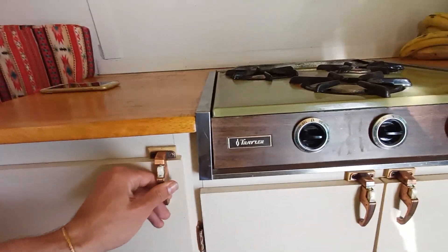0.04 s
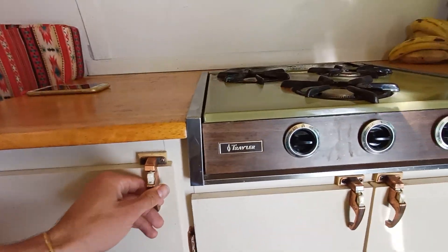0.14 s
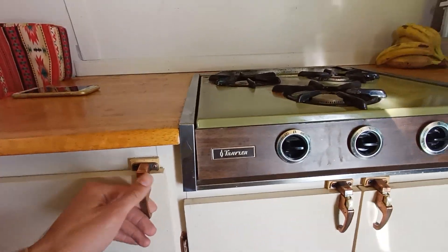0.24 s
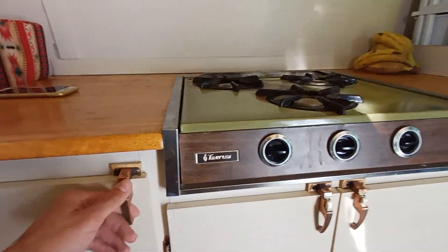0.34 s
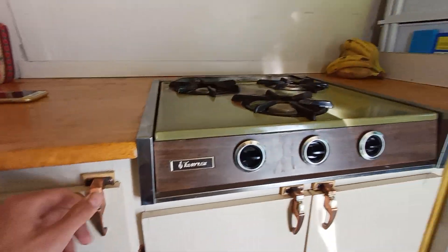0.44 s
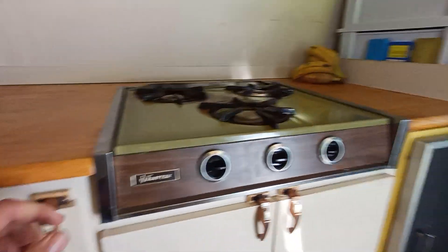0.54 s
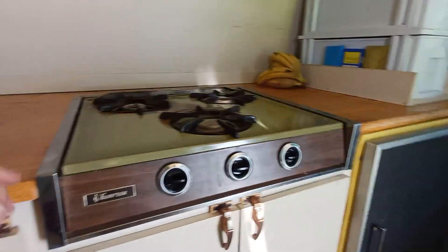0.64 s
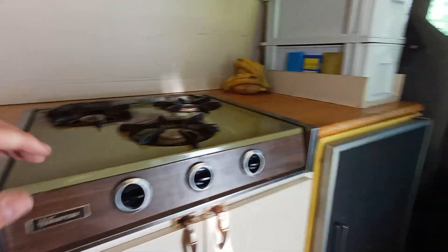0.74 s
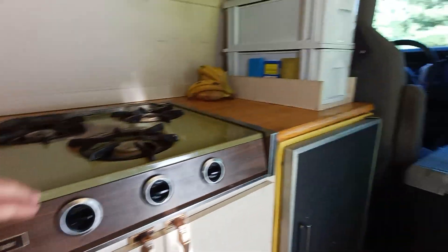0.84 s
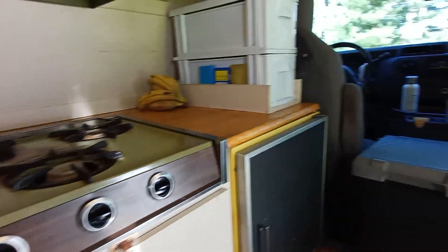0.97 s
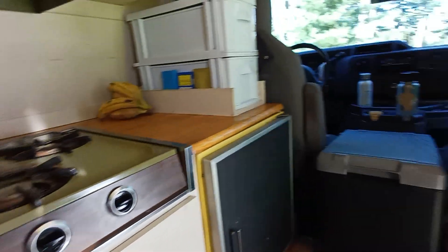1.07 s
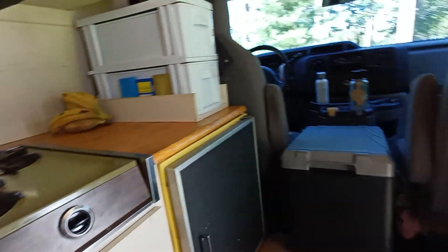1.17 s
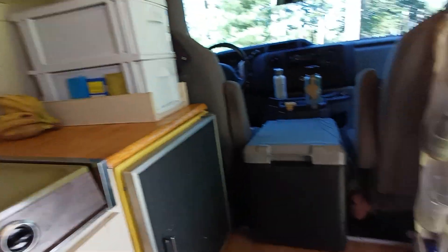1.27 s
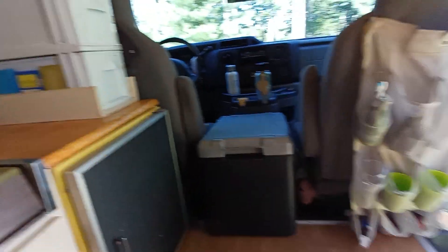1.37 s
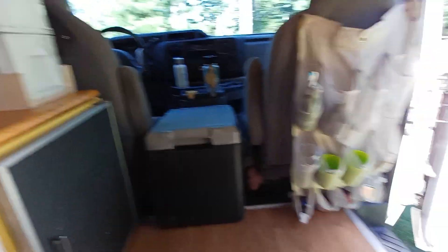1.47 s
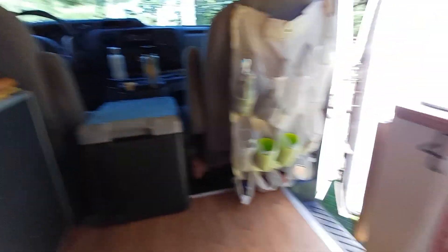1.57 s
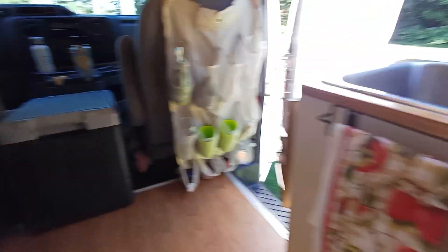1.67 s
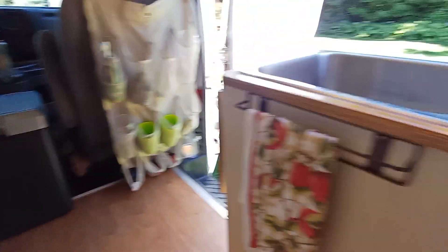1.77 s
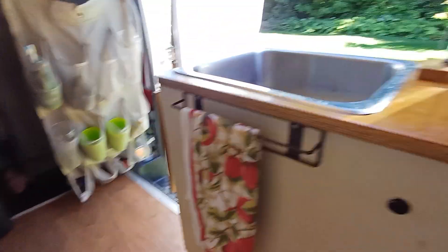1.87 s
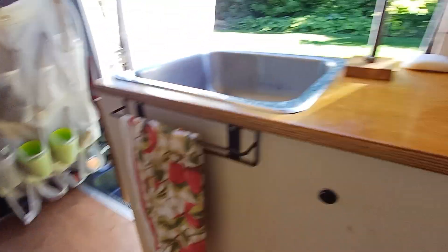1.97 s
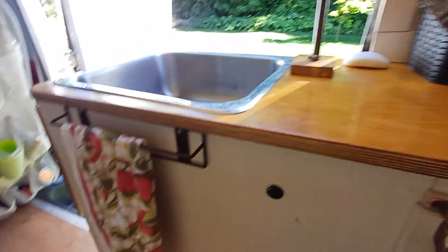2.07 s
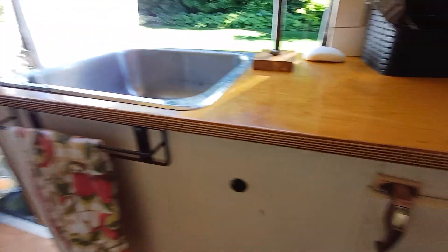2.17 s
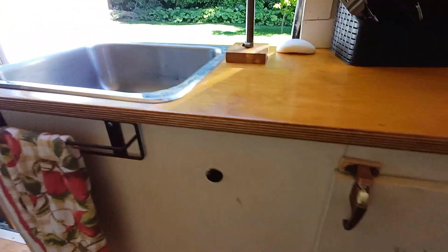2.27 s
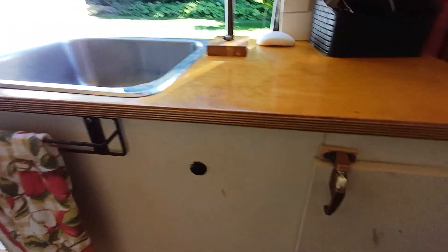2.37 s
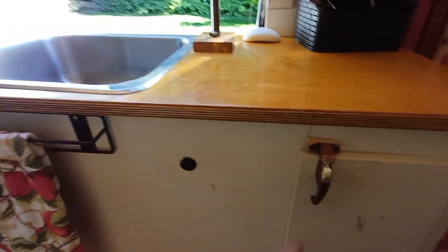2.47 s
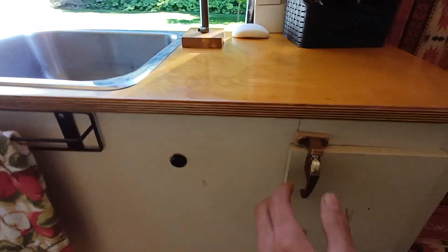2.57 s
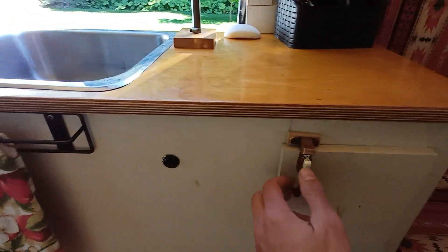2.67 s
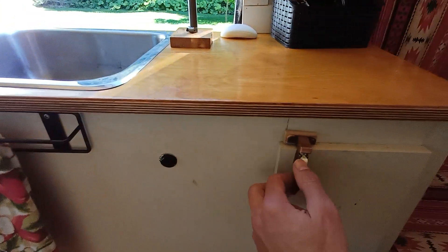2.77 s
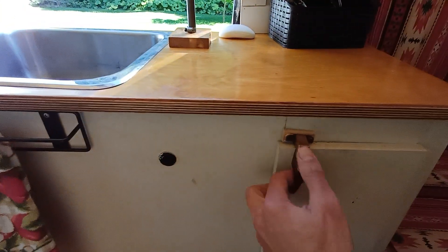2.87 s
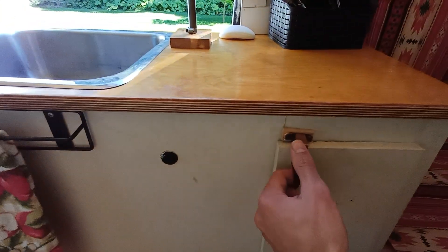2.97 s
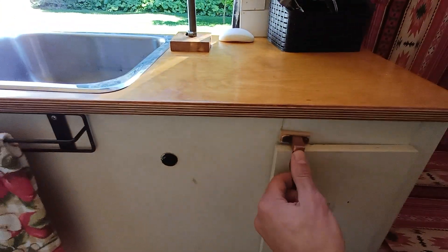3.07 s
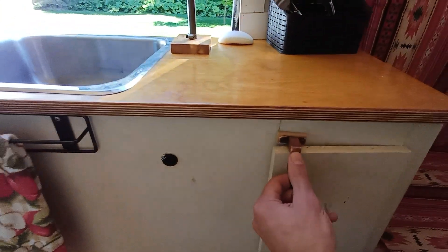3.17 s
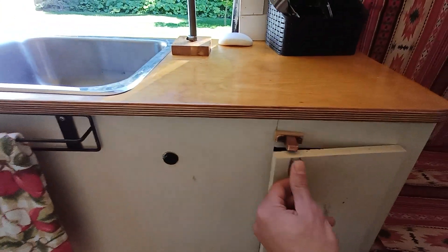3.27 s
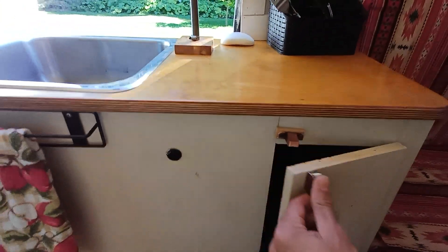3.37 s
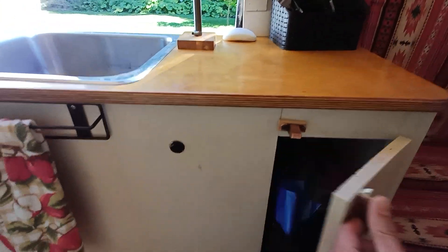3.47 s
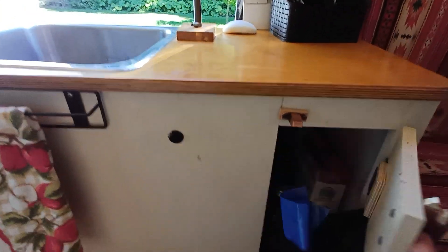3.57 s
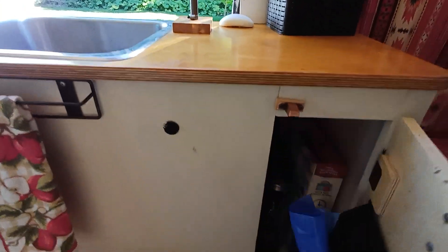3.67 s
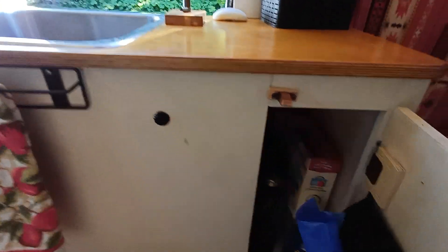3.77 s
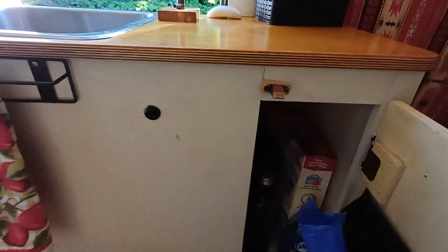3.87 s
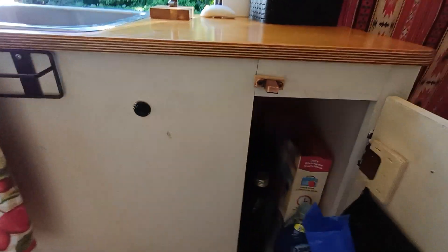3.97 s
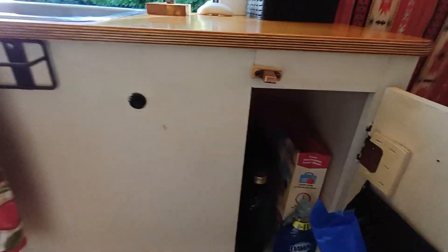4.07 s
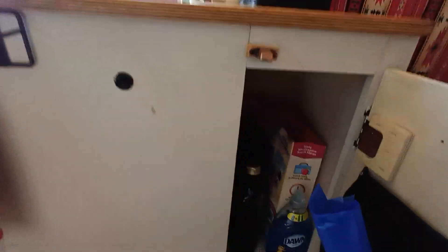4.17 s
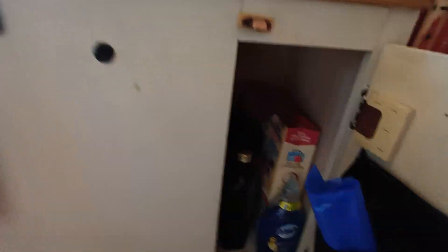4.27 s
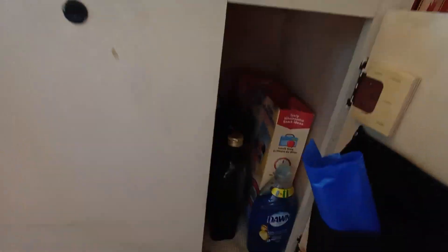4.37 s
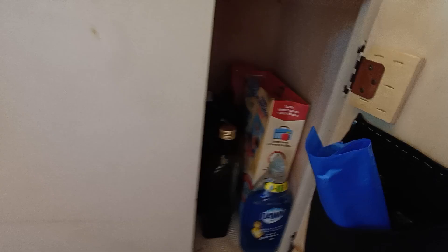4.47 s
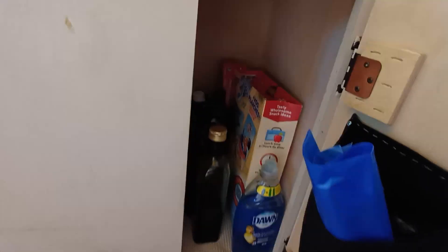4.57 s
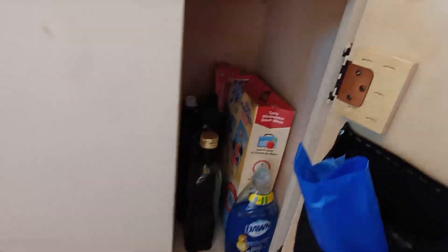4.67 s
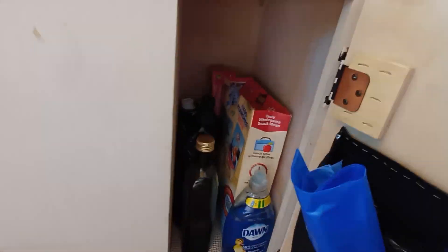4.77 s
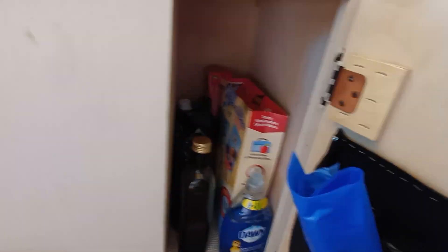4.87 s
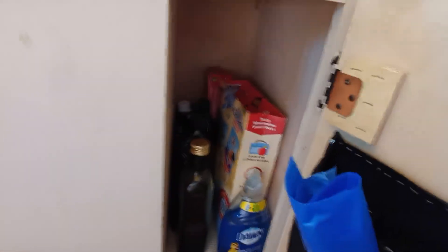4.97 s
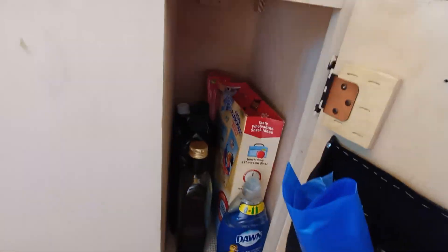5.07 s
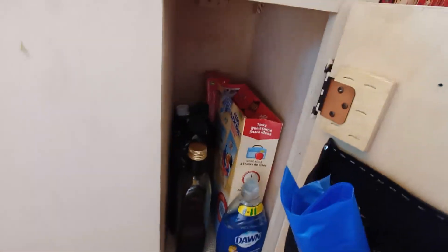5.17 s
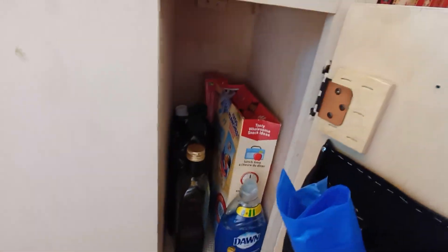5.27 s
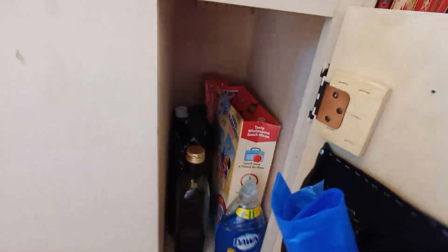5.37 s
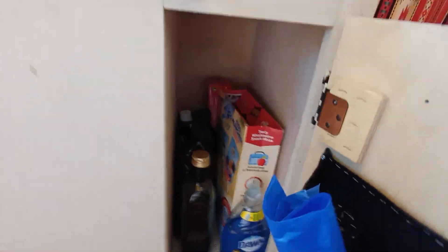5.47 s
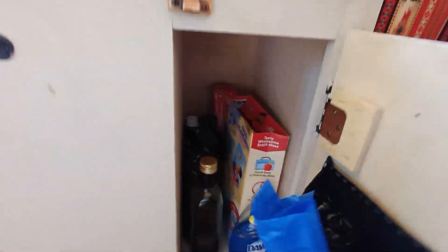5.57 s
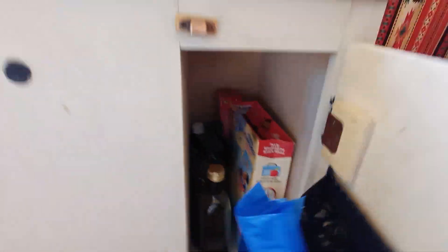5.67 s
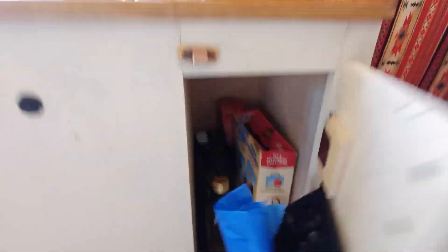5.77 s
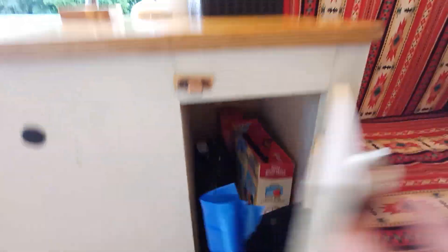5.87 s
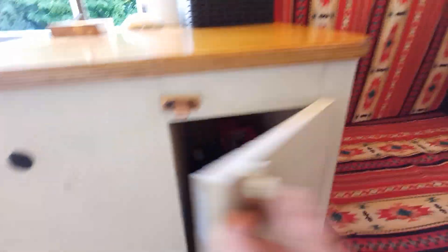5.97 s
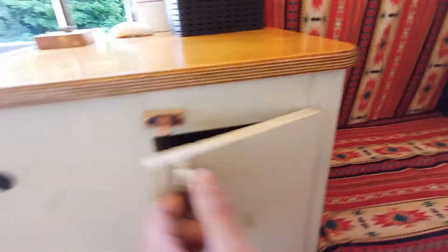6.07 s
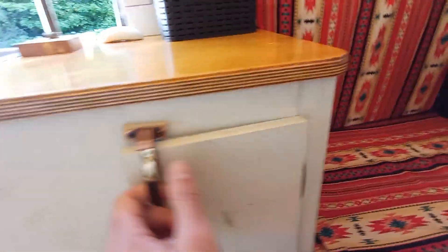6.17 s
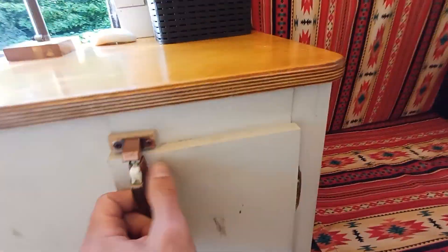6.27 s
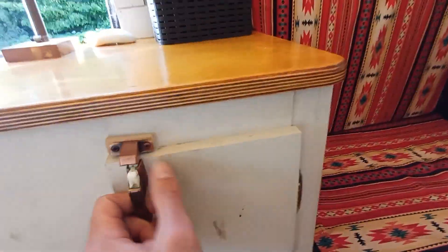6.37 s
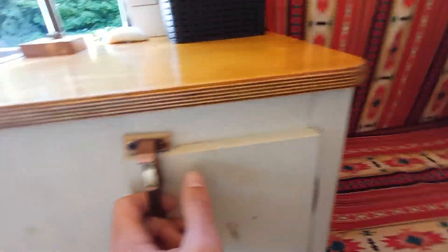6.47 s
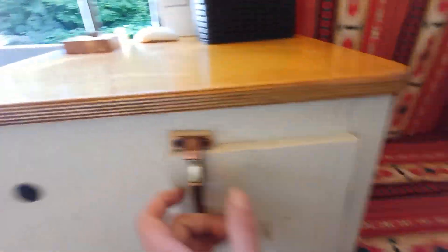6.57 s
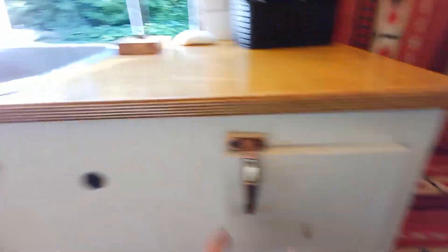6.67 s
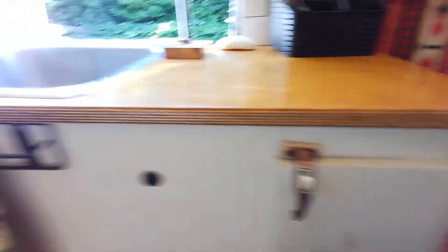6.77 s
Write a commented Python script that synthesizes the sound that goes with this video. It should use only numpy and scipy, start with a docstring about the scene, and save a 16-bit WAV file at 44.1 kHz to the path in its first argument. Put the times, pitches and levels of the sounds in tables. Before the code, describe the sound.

In the cramped interior of a parked camper van, heard from close up, a wooden cupboard door thuds and rattles as it is latched. Soft footfalls and rustling clothes come next, then light knocks and clicks as a second door is unlatched. Only a faint hum and a far-off outdoor hush remain for a couple of seconds, until the door is shut with a loud clack of wood and metal.

```python
"""Inside a parked camper van, a hand latches the small plywood door of the stove cabinet. The person
turns round, pops the metal catch of the door under the sink, swings it open and claps it shut.
Each impact excites damped modes: the frame thuds, the panel knocks, the catch clicks, and the close
walls add a short reverberation. The steel sink rings on faintly and clothes swish by friction with
each move. A low hum and a distant outdoor wash lie underneath."""
import sys
import numpy as np
from scipy import signal
from scipy.fft import rfft, irfft
from scipy.io import wavfile
from scipy.ndimage import uniform_filter1d

SR = 44100
rng = np.random.default_rng(int(sys.argv[2]) if len(sys.argv) > 2 else 0)


def digitize_waveform(pressure):
    """Quantize a signal to 16-bit integers and store it at the path in sys.argv[1].

    Rows of a 2-D input are taken as channels; values are limited to [-1, 1].
    """
    field = np.atleast_2d(pressure).T
    bounded = np.clip(field, -1, 1)
    quanta = np.round(bounded * 32767).astype(np.int16)
    wavfile.write(sys.argv[1], SR, quanta)


N = 300762
TIME = np.arange(N) / SR
RING_TIME = np.arange(SR // 3) / SR  # time since an impact [s]

# left-right coherence of nearby sources and of a diffuse field: (frequency [Hz], coherence [1])
NEAR_COHERENCE = [(60, .995), (140, .985), (280, .92), (550, .8), (1100, .45), (2000, .03), (16000, 0)]
DIFFUSE_COHERENCE = [(60, 0.6), (160, 1), (270, .69), (450, 0.85), (740, 0.12), (1220, -0.17), (3300, 0.14),
                     (16000, 0.58)]
# modes of the cabinets: (frequency [Hz], relative level [dB], nominal T60 [s])
STOVE_FRAME_MODES = [(63, 0, .19), (92, -6, .1), (108, -6, .1), (136, -3, .15)]
SINK_PANEL_MODES = [(264.4, -11.5, 0.17), (335, -4.5, 0.14), (374, -11, 0.12), (529, -23.5, 0.25),
                    (664, -12.5, 0.18), (865, -18, 0.12), (1060, -3, 0.14), (1120, 0, 0.094),
                    (1194, -0.5, 0.073), (1545, -2, 0.052), (1688, -2, 0.098), (1908, -11.5, 0.2),
                    (2244, -1, 0.084), (2375, -3.5, 0.12), (2800, -2.5, 0.086), (3168, -2, 0.063)]


def amp(db):
    return 10 ** (np.asarray(db) / 20)


def unit_rms(x):
    return x / np.sqrt(np.mean(x ** 2) + 1e-20)


def curve_at(points, hz):
    """Interpolation on a logarithmic frequency axis."""
    frequency, value = np.transpose(points)
    return np.interp(np.log(hz + 1), np.log(frequency + 1), value)


def pan_gains(db):
    """A level difference, split equally between left and right."""
    return amp(np.array([[.5], [-.5]]) * db)


def pan_spectrum(x, balance):
    """A level difference that varies with frequency leans each band left or right."""
    return irfft(rfft(x) * pan_gains(curve_at(balance, np.fft.rfftfreq(N, 1 / SR))), N)


def noise(spectrum, coherence=DIFFUSE_COHERENCE, size=N):
    """Partial coherence: two channels of coloured noise share part of a random-phase signal."""
    hz = np.fft.rfftfreq(size, 1 / SR)
    left, independent = np.exp(2j * np.pi * rng.random((2, len(hz))))
    shared = np.clip(curve_at(coherence, hz), -1, 1)
    right = shared * left + np.sqrt(1 - shared ** 2) * independent
    return unit_rms(irfft(np.array([left, right]) * amp(curve_at(spectrum, hz)), size))


def background(hum_db=-60.5, hum_follows=0.39, swell_db=2, wash_gain_db=4.5):
    """Slow amplitude modulation of noise: an unevenly swelling hum and the wash from outdoors."""
    # (frequency [Hz], relative spectral density [dB])
    hum_spectrum = [(12, -46), (20, -15.5), (35, -14), (59, -1.5), (130, -5.5), (166, -16.5), (204, -14),
                    (242, -23.5), (300, -15.5), (390, -34), (660, -120)]
    wash_spectrum = [(120, -25), (200, -8), (300, -9), (420, -14), (600, -10), (810, 0), (1000, -4),
                     (1500, -6), (2020, -8), (2450, -23), (3100, -31), (8000, -37), (9400, -41),
                     (12000, -37), (16000, -38)]
    # lean of the wash: (frequency [Hz], left minus right [dB])
    wash_balance = [(60, 3), (110, -3), (200, 5.5), (380, 2), (700, 0), (1290, -3), (2380, -5),
                    (4400, -1.5), (8120, 4), (15000, -3.5)]
    # slow rise and fall, low after each clatter: (time [s], relative level [dB])
    contour = [(.4, -65.5), (.75, -73.5), (1.3, -62), (2.3, -61), (2.95, -62.5), (3.35, -57.5), (3.7, -62),
               (4.6, -66), (5.3, -63), (6.15, -62.5), (6.5, -66), (6.8, -63.5)]
    knots = np.arange(0, N / SR + 1, .12)
    swell = swell_db * np.interp(TIME, knots, rng.standard_normal(len(knots)))
    contour_db = np.interp(TIME, *np.transpose(contour))
    hum = amp(hum_db + hum_follows * (contour_db - contour_db.mean()) + swell) * noise(hum_spectrum)
    wash = amp(contour_db + wash_gain_db) * noise(wash_spectrum)
    return hum + pan_spectrum(wash, wash_balance)


def van_reverb(x, wet_db):
    """Reverberation: dense reflections from close furnished walls die at a rate set by frequency."""
    # reverberation time: (frequency [Hz], T60 [s])
    decay_times = [(100, 0.45), (400, 0.29), (1200, 0.094), (4000, 0.18), (9000, 0.05), (16000, 0.18)]
    reflections = noise([(60, -13.5), (200, -3), (600, 2.5), (16000, -3.0)], size=len(RING_TIME))
    hz, t, bands = signal.stft(reflections, SR, nperseg=256)
    decay = amp(-60 * t / curve_at(decay_times, hz)[:, None])
    tail = signal.istft(bands * decay, SR, nperseg=256)[1][:, :len(RING_TIME)] * onset(0.007)
    return x + amp(wet_db) * signal.fftconvolve(x, tail / np.linalg.norm(tail[0]), axes=1)[:, :N]


def basin(start_s=3.11):
    """Free vibration: the lightly damped steel sink rings on once its door is free."""
    # (frequency [Hz], level [dB], T60 [s])
    modes = [(118, -59.5, 3.5), (297, -68.5, 4.2)]
    age = np.maximum(TIME - start_s, 0)
    return sum(amp(db - 60 * age / t60) * np.sin(2 * np.pi * hz * age) for hz, db, t60 in modes)


def resonate(x, hz, width_hz):
    """Heterodyning: shift down, low-pass and shift back for a resonance that follows the curve hz."""
    carrier = np.exp(2j * np.pi * np.cumsum(hz) / SR)
    return 2 * (carrier * signal.lfilter(*signal.butter(2, width_hz / 2, fs=SR), x / carrier)).real


def cloth_strokes(edge_db=-19.5, roundness=1.66):
    """Incoherent addition: arched strokes sum in power, and the strongest dominates the pitch."""
    # the body turns round, then the arm swings the sink door open and shut:
    # (peak time [s], rise [s], fall [s], relative swish [dB], relative fizz [dB], weave pitch [Hz])
    strokes = [ (0.89, 0.12, 0.13, -66, -74.5, 3000), (1.28, .14, 0.17, -51.5, -57, 2800),
               (1.39, 0.15, 0.092, -49, -58.5, 3200), (1.68, 0.24, 0.12, -62.5, -71, 3000),
               (1.80, 0.076, 0.095, -36.5, -57, 2267), (1.86, 0.11, 0.13, -30.5, -46, 3226),
               (1.95, 0.13, 0.13, -33.5, -49.5, 3756), (2.015, 0.055, 0.1, -38, -48, 3500),
               (2.19, 0.087, 0.069, -44.5, -58, 3200), (3.425, 0.12, 0.076, -59.5, -65.5, 2700),
               (3.485, 0.069, 0.06, -53, -68, 4200), (3.85, 0.068, 0.14, -56, -81, 2800),
               (5.99, .06, .08, -77, -97, 2780), (6.165, .04, .05, -65, -64.5, 3026),
               (6.21, 0.066, 0.043, -58, -65, 2887), (6.59, .04, 0.11, -81, -76.5, 2900)]
    peak, rise, fall, swish_db, fizz_db, hz = np.transpose(strokes)[:, :, None]
    t = np.linspace(0, N / SR, num=N // 64)
    from_peak = np.maximum((peak - t) / rise, (t - peak) / fall)
    arch_db = np.maximum(edge_db * from_peak ** roundness, -120)
    swish_power, fizz_power = amp(swish_db + arch_db) ** 2, amp(fizz_db + arch_db) ** 2
    weave_hz = np.average(hz * np.ones_like(t), axis=0, weights=swish_power)
    controls = np.sqrt(swish_power.sum(0)), np.sqrt(fizz_power.sum(0)), weave_hz
    return [np.interp(TIME, t, control) for control in controls]


def clothes(swish_db=-2, weave_db=-1.0, grip_db=0.58, snag_db=1.0):
    """Friction noise: cloth slides over cloth, the weave sings, folds and fibres catch unevenly."""
    # the rub and its fine fizz: (frequency [Hz], relative spectral density [dB])
    cloth_spectrum = [(59, -51), (100, -17), (140, -12), (252, -12), (388, -7), (524, -10), (670, -2),
                      (872, -17.5), (958, -5), (1070, -8), (1820, -2.5), (3650, -2.5), (9000, -12),
                      (11700, -50.5), (19800, -120)]
    fizz_spectrum = [(6000, -21), (9000, -8.5), (10000, -3), (11700, 1.5), (14000, -2), (16000, -12)]
    # lean of the rustle: (frequency [Hz], left minus right [dB])
    balance = [(60, 0), (110, 4), (200, -1), (380, 0), (700, -1.5), (1290, -4), (2380, -4), (4400, -0.5),
               (8120, 0.5), (15000, -4)]
    swish, fizz, weave_hz = cloth_strokes()
    folds = unit_rms(uniform_filter1d(rng.standard_normal(N), size=400))
    fibres = unit_rms(uniform_filter1d(rng.standard_normal(N), size=30))
    weave = unit_rms(resonate(noise(cloth_spectrum), weave_hz, width_hz=2500))
    rub = swish * (amp(swish_db) * noise(cloth_spectrum) + amp(weave_db) * weave)
    rub += fizz * noise(fizz_spectrum)
    return pan_spectrum(amp(grip_db * folds + snag_db * fibres) * rub, balance)


def onset(rise_s):
    """Exponential build-up with time constant rise_s."""
    return 1 - np.exp(-RING_TIME / rise_s)


def dense_modes(spectrum, t60):
    """Modal overlap: a crowd of unresolved modes, struck at once, decays as noise."""
    return noise(spectrum, NEAR_COHERENCE, size=len(RING_TIME)) * amp(-60 * RING_TIME / t60)


def ring(modes, scatter_rad, t60_scale):
    """Superposition of damped modes; short waves arrive left and right at different phases."""
    hz, db, t60 = np.transpose(modes)[:, :, None]
    sign = (-1) ** np.arange(len(hz))[:, None]  # neighbouring modes swing opposite ways
    phase_offset = sign * np.arccos(np.clip(curve_at(NEAR_COHERENCE, hz), -1, 1)) / 2
    strike_phase = scatter_rad * rng.standard_normal(hz.shape)  # where the blow lands
    phase = 2 * np.pi * hz * RING_TIME + strike_phase
    envelope = sign * amp(db - 60 * RING_TIME / (t60 * t60_scale)) / np.linalg.norm(amp(db))
    return np.array([(envelope * np.sin(phase + side * phase_offset)).sum(0) for side in (-1, 1)])


def impacts(blows, frame, panel, grain_db, grain_t60, click_t60, spring_db, thud_rise_s, scatter_rad,
            pan_db, pan_scatter_db=1):
    """Impact excitation: each blow shakes the frame, knocks the panel and clicks the metal catch."""
    # dense plywood grain and the catch's click: (frequency [Hz], relative spectral density [dB])
    plywood_spectrum = [(80, -25), (200, -6.5), (330, 2), (480, -1.5), (700, -4.5), (1000, -4),
                        (2000, -5.5), (3200, -9), (5000, -10.5), (9000, -12.5), (16000, -18)]
    catch_spectrum = [(300, -18.5), (1200, -7), (2800, -2), (4500, -0.5), (5800, -6.5), (7200, -4.5),
                      (9500, -11), (11500, -6.5), (13000, -2), (14300, -13), (16000, 1.5)]
    # the catch's sprung metal: (frequency [Hz], relative level [dB], nominal T60 [s])
    spring_modes = [(3250, 0, .03), (4570, -1, .04), (6500, -3, .04), (7300, -5, .035), (11000, -4, .025),
                    (12900, 0, .025)]
    mix = np.zeros((2, N))
    for start_s, thud_db, knock_db, click_db, cutoff_hz in blows:
        # a firm blow presses the door against its frame and shortens the ring
        t60_scale = np.interp(knock_db, (-41, -8), (1.1, 0.57))
        thud = ring(frame, 0.25, t60_scale) * onset(thud_rise_s)
        wood = ring(panel, scatter_rad, t60_scale)
        wood += amp(grain_db) * dense_modes(plywood_spectrum, grain_t60 * t60_scale)
        contact = signal.butter(2, cutoff_hz, fs=SR)  # a soft contact leaves the high modes quiet
        knock = signal.lfilter(*contact, wood * onset(0.00052))
        metal = dense_modes(catch_spectrum, click_t60)
        metal += amp(spring_db) * ring(spring_modes, scatter_rad, t60_scale)
        click = metal * onset(0.00038)
        lean = pan_gains(pan_db + pan_scatter_db * rng.standard_normal())
        blow = 2 * amp(thud_db) * thud + lean * amp(knock_db) * knock + 2 * amp(click_db) * click
        span = mix[:, round(start_s * SR):][:, :len(RING_TIME)]
        span += blow[:, :span.shape[1]]
    return mix


def steps():
    """Soft impacts excite mainly low modes: dull, light knocks as the person turns round."""
    # (time [s], frame thud gain [dB], knock gain [dB], click gain [dB], knock cutoff [Hz])
    blows = [(0.885, -49, -49.5, -64, 450), (0.935, -43, -50.5, -77, 455), (1.083, -48, -54.5, -53, 1460),
             (1.170, -59, -52.5, -61, 800), (2.000, -49.5, -38, -47, 1200)]
    return impacts(blows, STOVE_FRAME_MODES, SINK_PANEL_MODES, grain_db=-0.5, grain_t60=0.29,
                   click_t60=0.099, spring_db=-19, thud_rise_s=0.0084, scatter_rad=0.84, pan_db=-2.0)


def stove_door():
    """Repeated contact: the door clatters shut and seats; its lever is pressed home and let go."""
    # (time [s], thud gain [dB], knock gain [dB], click gain [dB], knock cutoff [Hz])
    blows = [ (0.000, -27, -16, -26.5, 2500), (0.0085, -13.5, -11, -30.5, 2700),
             (0.025, -31, -15.5, -30.5, 3500), (0.0425, -22, -9, -35.5, 2280),
             (0.054, -41, -22, -33.5, 4040), (0.074, -45, -19, -37.5, 1800),
             (0.1245, -52, -30.5, -35.5, 3980), (0.135, -26, -21.5, -67, 490),
             (0.211, -43, -23.5, -38.5, 2830), (0.228, -25, -22.5, -44, 1910), (0.256, -41, -29, -60, 2010),
             (0.274, -23, -29.5, -46.5, 3060), (0.285, -33, -25, -45.5, 1290),
             (0.332, -42, -41.5, -63.5, 1210), (0.507, -47.5, -48.5, -67, 3920)]
    # (frequency [Hz], relative level [dB], nominal T60 [s])
    panel_modes = [(275, -4.5, 0.062), (343.5, -10.5, 0.15), (422, -20, 0.16), (680, 3, 0.1),
                   (746.6, -1, 0.12), (833, -8.5, 0.22), (968, -6, 0.12), (1160, -0.5, 0.063),
                   (1248, -6, 0.14), (1290, -0.5, 0.098), (1384, -6, .07), (1800, -12, .09),
                   (2396, -19, 0.24)]
    return impacts(blows, STOVE_FRAME_MODES, panel_modes, grain_db=-3.5, grain_t60=0.13,
                   click_t60=0.075, spring_db=-14.5, thud_rise_s=0.0023, scatter_rad=0.51, pan_db=0.0)


def sink_door():
    """Snap action: the pulled catch pops free; later it snaps over as the door slams and rebounds."""
    # (time [s], thud gain [dB], knock gain [dB], click gain [dB], knock cutoff [Hz])
    blows = [ (2.696, -52, -39.5, -60.5, 910), (2.718, -58, -30.5, -85, 450), (2.784, -33.5, -24, -84, 694),
             (2.983, -50, -47.5, -88, 450), (3.059, -43, -31.5, -59, 710), (3.087, -54, -34.5, -43, 4040),
             (3.095, -50, -24.5, -36.5, 4140), (3.110, -39, -46.5, -44, 2000),
             (3.419, -76, -38.5, -54, 4500), (3.464, -47.5, -42.5, -73, 450), (6.231, -47, -30, -49, 4500),
             (6.238, -50, -33, -53.5, 4500), (6.250, -42, -13, -14, 5970),
             (6.2635, -34.5, -10.5, -30, 2000), (6.2662, -16.5, -6.5, -38.5, 3370),
             (6.270, -23.5, -19.5, -37.5, 3000), (6.287, -23, -15.5, -49, 2600),
             (6.425, -68, -51, -85, 800), (6.558, -82.5, -56, -73, 2500), (6.594, -71, -50.5, -83, 2440)]
    # (frequency [Hz], relative level [dB], nominal T60 [s])
    frame_modes = [(63, -12, .18), (104, -6, .12), (137, 0, .2), (194, -10, .14)]
    return impacts(blows, frame_modes, SINK_PANEL_MODES, grain_db=-2, grain_t60=0.081,
                   click_t60=0.028, spring_db=-5, thud_rise_s=0.003, scatter_rad=0.5, pan_db=-2.5)


def scene():
    """Linear superposition: reverberant doors and steps add to the basin, clothes and background."""
    stove, sink = stove_door(), sink_door()
    knocks = van_reverb(stove + steps(), wet_db=-11.5) + van_reverb(sink, wet_db=-18.5)
    return knocks + basin() + clothes() + background()


def record(dry):
    """Band limiting: a linear-phase low-pass removes the highest treble."""
    lowpass = signal.firwin(511, cutoff=16100, window=("kaiser", 9), fs=SR)
    return signal.oaconvolve(dry, lowpass[None], "same")


dry = scene()
out = record(dry)
digitize_waveform(out)
```